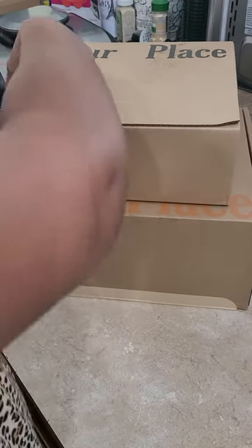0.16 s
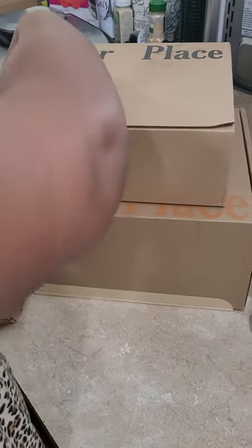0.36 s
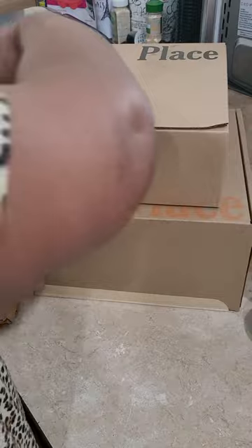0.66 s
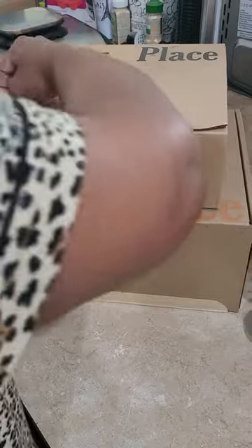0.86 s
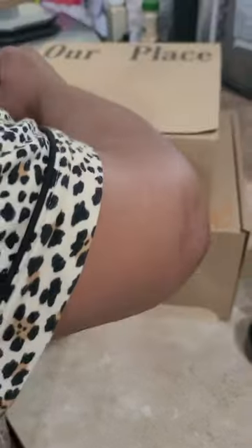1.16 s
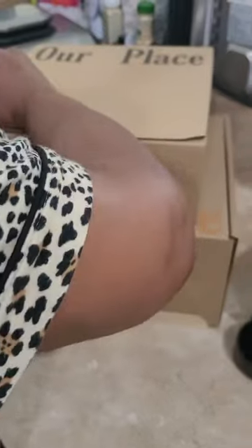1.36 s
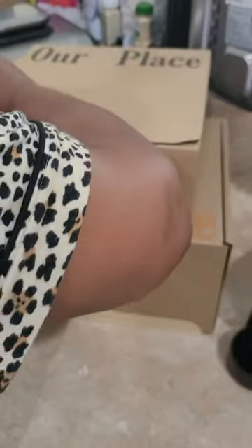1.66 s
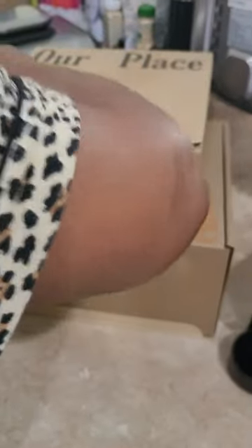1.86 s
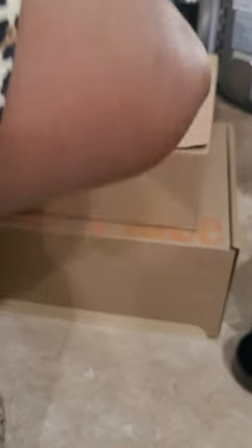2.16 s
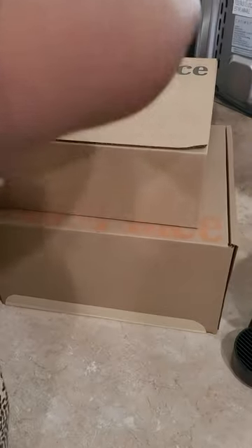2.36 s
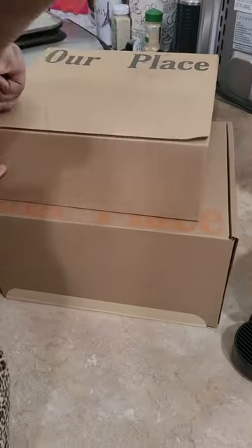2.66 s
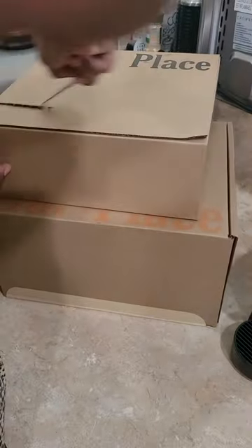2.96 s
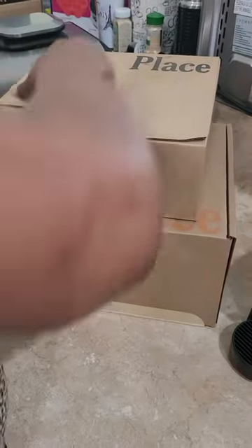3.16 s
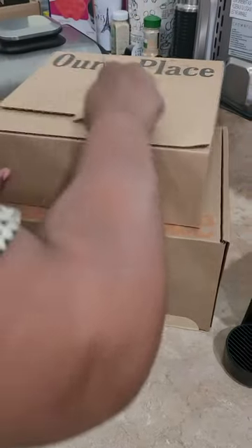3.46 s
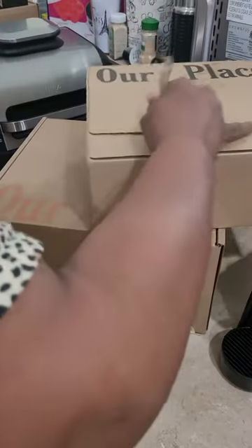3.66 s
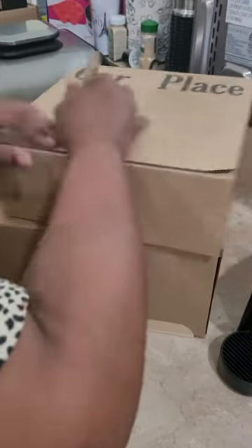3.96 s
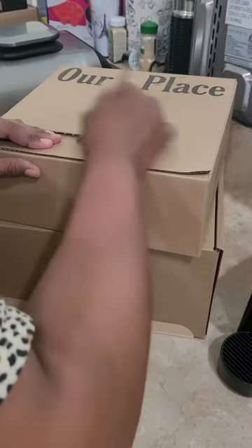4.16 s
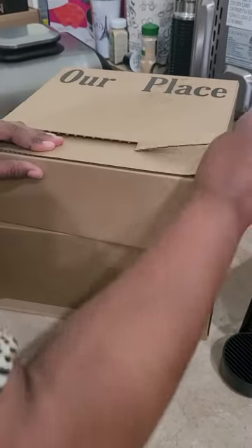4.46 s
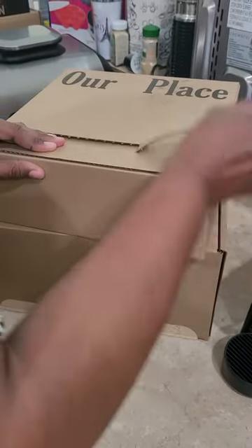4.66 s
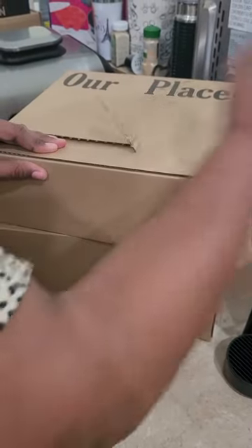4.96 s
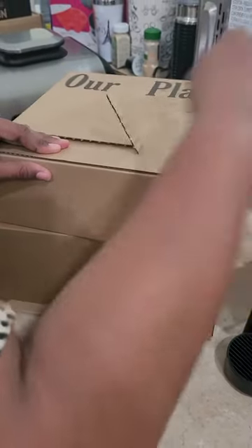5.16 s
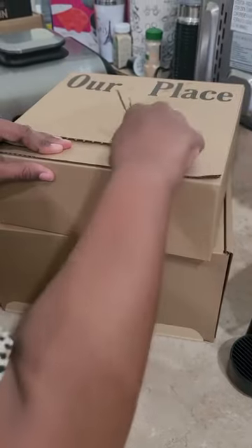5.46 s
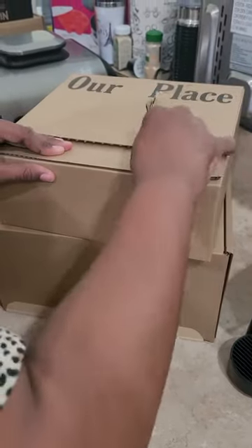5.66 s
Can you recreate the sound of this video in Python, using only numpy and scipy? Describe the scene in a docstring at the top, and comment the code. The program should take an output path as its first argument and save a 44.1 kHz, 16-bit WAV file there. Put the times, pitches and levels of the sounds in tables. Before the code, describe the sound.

In a small kitchen with low steady appliance hum, fingers faintly tap and brush a cardboard box. A nail picks at its tab, then the perforated strip rips in uneven bursts of snaps, papery rasp and hollow lid thumps, with shorter pulls and rubs afterwards. Close stereo microphones hear the box somewhat to the left, with a short room echo.

```python
"""Opening a cardboard box

Fingers tap, brush and pick at a box in a kitchen, then rip its perforated strip in several pulls.
Each paper bridge snaps with a noise crack and ringing panels; noise made of tiny breaks rasps in between.
The lid and flap boom as low resonances. Two spaced microphone ports hear the box from the left,
in a small room of fading noise echoes, over a low appliance hum of shaped noise."""
import sys
import numpy as np
from scipy import signal
from scipy.fft import rfft, irfft, next_fast_len
from scipy.io import wavfile
from scipy.ndimage import map_coordinates

SR = 44100
rng = np.random.default_rng(int(sys.argv[2]) if len(sys.argv) > 2 else 0)


def transcribe(u):
    """Save the signal u as a 16-bit wav file named by the first command-line argument.

    u: samples, shape (n,) or (channels, n), limited to [-1, 1]; the rate is SR.
    q: integer samples, one column per channel.
    """
    v = np.clip(np.atleast_2d(u).T, -1, 1)
    q = np.round(v * 32767).astype(np.int16)
    wavfile.write(sys.argv[1], SR, q)


N = 256662  # length in samples

# Paper bridges snapping: start_s, crack_db, panel_knock_db, edge_tick_db
BRIDGE_SNAPS = [(2.706, -23.5, -29.5, -18), (2.748, -20, -35, -27.5), (2.758, -16, -24.5, -14.5),
                (2.813, -22, -15.5, -22.5), (2.830, -22.5, -18, -19.5), (2.846, -20, -20, -15.5),
                (2.877, -20, -18, -23), (2.889, -20, -28, -21.5), (2.903, -26, -29, -20),
                (2.919, -18, -22.5, -23), (3.267, -27, -32.5, -26.5), (3.316, -31, -23, -31),
                (3.364, -19, -23, -29), (3.387, -21, -30, -34), (3.446, -40.5, -22.5, -22.5),
                (3.467, -28, -24, -31), (3.487, -54, -12, -9), (3.496, -46, -14, -25),
                (3.588, -57, -19.5, -19.5), (3.730, -36.5, -43, -34), (3.839, -25, -38.5, -24),
                (4.058, -17.5, -39, -26.5), (4.088, -23, -28.5, -36), (4.124, -10.5, -20.5, -15),
                (4.149, -19, -24.5, -29.5), (4.169, -20, -21, -40), (4.193, -15, -24, -31),
                (4.211, -12.5, -16.5, -26), (4.237, -17.5, -16.5, -14.5), (4.772, -47, -38, -48.5),
                (4.811, -19.5, -25, -29.5), (4.84, -34, -27.5, -37), (4.855, -21, -16.5, -20.5),
                (5.724, -38.5, -61, -64.5), (5.74, -29.5, -30, -23), (5.751, -14.5, -16, -12),
                (5.8, -25.5, -31, -20)]
# Resonances of the corrugated panels: pitch_hz, width_hz, level_db
PANEL_MODES = [(660, 133, 3.5), (805, 72, 6), (1084, 272, 0.5)]
# Resonances of the stiff cut edge: pitch_hz, width_hz, level_db
EDGE_MODES = [(1277, 242, 8), (1753, 82, 4.5), (1950, 540, -1.5)]


def snaps():
    """Each breaking bridge is a crack of paper, a tick in the edge and a knock in the panels."""
    start_s, crack_db, knock_db, tick_db = np.transpose(BRIDGE_SNAPS)
    bands_hz = crack_band(crack_db, tick_db)
    crack = fibre(cracks(start_s, crack_db, bands_hz, t60=0.012, fray=0.18, focus_db=5.5))
    knock = struck(start_s, knock_db, PANEL_MODES, contact=0.00084, spread=0.0044)
    tick = struck(start_s, tick_db, EDGE_MODES, contact=0.0002, spread=0.0064)
    return crack + knock + tick


def crack_band(crack_db, ring_db):
    """The more a break cracks over its ring or tick, the lower its favoured band, in Hz."""
    octave_per_db = -0.06
    return 5570 * 2 ** (octave_per_db * (crack_db - ring_db))


# Bright colour of breaking paper: pitch_hz, level_db (per Hz)
FIBRE_COLOUR = [(1700, -37), (2260, 3.5), (2830, 1), (7200, -1), (8250, 2.5), (9600, -3), (14300, -3),
                (16000, -9.5)]


def fibre(x):
    """The bright colour of breaking paper."""
    return coloured(x, FIBRE_COLOUR)


# Soft rubbing, thinner than tearing: pitch_hz, level_db (per Hz)
RUB_COLOUR = [(1500, -32.5), (3000, 4.5), (5500, 5), (9000, 6.5), (16000, -5)]
# The lid shaking while it is handled: time_s, rumble_db
LID_SHAKE = [(2.6, -86), (2.74, -42), (2.95, -40), (3.05, -70), (3.27, -52), (3.35, -27.5), (3.52, -57),
             (3.7, -50.5), (3.92, -43.5), (4.04, -53), (4.2, -28), (4.45, -85), (4.84, -39.5), (5.0, -74),
             (5.4, -52.5), (5.62, -78)]


def pull():
    """Gentle effort only rubs; strong effort parts fibres in grit. Board rattles and lid rumbles too."""
    rasp_db, rattle_db = efforts()
    tearing = np.clip((rasp_db + 53) / 16, 0, 1)  # 0 only rubs, 1 only tears
    rub_grit = grit(per_s=900, scatter_db=1.5, smooth=2.5, t60=0.01, count=2)
    rub = unit(coloured(rub_grit, RUB_COLOUR))
    tear = unit(fibre(grit(per_s=330, scatter_db=4, smooth=0.65, t60=0.006, count=2)))
    common, own = amp(rasp_db) * (np.sqrt(1 - tearing) * rub + np.sqrt(tearing) * tear)

    # A rasp comes from a long line of paper, so the ports hear partly unlike noise
    wide = 0.6  # radians
    rasp = np.cos(wide) * common + np.sin(wide) * np.array([own, -own])

    rattling = grit(per_s=80, scatter_db=-3.5, smooth=0.24, t60=0.063)
    rattle = amp(rattle_db) * unit(ringing(rattling, PANEL_MODES + EDGE_MODES, spread=0))

    shaking = grit(per_s=100, scatter_db=-3, smooth=0.95, t60=0.079)
    upper_lid = ringing(shaking, LID_MODES[:1], spread=0)
    deep_lid = amp(5.5) * ringing(shaking, LID_MODES[1:], spread=0)
    flap = amp(-4) * ringing(shaking, FLAP_MODES, spread=0)
    rumble = amp(curve(LID_SHAKE)) * unit(upper_lid + deep_lid + flap)
    return rasp + rattle + rumble


# Pulls on the strip or lid, one list for each pull: time_s, fibre_rasp_db, panel_rattle_db
STRIP_PULLS = [
    [(2.705, -42, -32.5), (2.745, -34.5, -41), (2.868, -31, -36), (2.91, -31.5, -28), (2.96, -41.5, -52)],
    [(3.27, -42, -39), (3.372, -33.5, -32), (3.422, -43.5, -46), (3.485, -39, -30.5), (3.515, -47, -36.5),
     (3.587, -44.5, -41.5), (3.751, -49, -54.5), (3.851, -42, -49.5), (3.991, -49.5, -44.5),
     (4.03, -55, -66)],
    [(4.088, -30.5, -45.5), (4.1, -29.5, -35.5), (4.118, -58, -52), (4.145, -31, -27),
     (4.185, -25.5, -32.5), (4.235, -32, -34), (4.28, -45, -53), (4.33, -55.5, -55.5)],
    [(4.735, -58, -65), (4.813, -43.5, -43), (4.845, -39, -37), (4.869, -47, -38.5), (4.93, -57.5, -76)],
    [(5.45, -51, -60), (5.475, -50.5, -47), (5.51, -48, -60), (5.565, -50, -57)],
    [(5.728, -53.5, -69.5), (5.74, -61, -48), (5.757, -48, -51), (5.78, -40.5, -55), (5.82, -37.5, -46)],
]
# Hands and sleeves brushing the board: full_contact_s, swell_s, hold_s, rasp_db
HAND_RUBS = [(0.0, .01, 0.042, -50.5), (0.563, 0.071, 0.051, -61), (0.854, 0.031, 0.0071, -64),
             (1.088, 0.012, 0.0064, -64), (1.464, 0.017, 0.012, -59), (1.592, 0.047, 0.038, -59),
             (1.735, 0.03, 0.011, -47.5), (1.787, 0.028, 0.15, -62), (2.572, 0.089, 0.0049, -43.5),
             (2.672, 0.058, 0.012, -53), (3.034, 0.12, 0.092, -59), (4.383, 0.046, 0.073, -61),
             (4.638, 0.12, 0.052, -64), (5.038, .015, 0.084, -58), (5.293, 0.0093, 0.004, -55),
             (5.194, 0.038, 0.013, -58.5), (5.352, 0.029, 0.031, -51)]


def efforts():
    """Levels of rasp and rattle in dB: the strongest gesture at each moment."""
    pull_swell_s = 0.014  # a pull starts sharply
    rasps, rattles = [], []
    for rows in STRIP_PULLS:
        time_s, rasp_db, rattle_db = np.transpose(rows)
        rasps.append(gesture(time_s, rasp_db, pull_swell_s))
        rattles.append(gesture(time_s, rattle_db, pull_swell_s))
    for contact_s, swell_s, hold_s, rasp_db in HAND_RUBS:
        rasps.append(gesture([contact_s, contact_s + hold_s], [rasp_db, rasp_db], swell_s))
    return np.max(rasps, axis=0), np.max(rattles, axis=0)


def gesture(time_s, level_db, swell_s):
    """A level curve in dB that swells into its first point and fades after its last."""
    swell_db, fade_db_per_s = 21.5, 489
    t = np.arange(N) / SR
    before = np.maximum(time_s[0] - t, 0)
    after = np.maximum(t - time_s[-1], 0)
    return np.interp(t, time_s, level_db) - swell_db * before / swell_s - fade_db_per_s * after


# The lid jumping back: start_s, boom_db, flap_db
LID_THUMPS = [(0.663, -54, -37), (1.836, -41.5, -65), (2.563, -66, -31.5), (2.705, -21, -18.5),
              (2.769, -16, -20.5), (2.782, -20, -19.5), (2.811, -16, -14), (2.842, -14.5, -14.5),
              (2.878, -14.5, -15), (3.03, -40.5, -42), (3.155, -40, -43), (3.303, -33, -29),
              (3.322, -24, -23.5), (3.358, -17, -17.5), (3.439, -29, -13), (3.469, -16.5, -12.5),
              (3.491, -13, -15), (3.502, -44, -7), (3.552, -26.5, -18), (3.582, -14.5, -15.5),
              (4.092, -17.5, -34.5), (4.127, -27.5, -17.5), (4.151, -17, -20), (4.167, -16, -18.5),
              (4.176, -14, -20), (4.21, -8, -16), (4.24, -20.5, -17.5), (4.81, -35.5, -25.5),
              (4.851, -15, -12), (5.242, -37, -33.5), (5.291, -20, -29.5), (5.743, -51, -14),
              (5.797, -30, -29)]
# Resonances of air and lid together: pitch_hz, width_hz, level_db
LID_MODES = [(158.7, 33, 4), (60.6, 54, -3)]
# Resonances of the loose flap: pitch_hz, width_hz, level_db
FLAP_MODES = [(251, 210, -2), (316.5, 56, 5), (446.5, 37, -1)]


def thumps():
    """The released lid and flap swing a few cycles."""
    start_s, boom_db, flap_db = np.transpose(LID_THUMPS)
    boom = struck(start_s, boom_db, LID_MODES, contact=0.0028, spread=0.082)
    flap = struck(start_s, flap_db, FLAP_MODES, contact=0.0019, spread=0.0895)
    return boom + flap


# A fingernail picking at the tab of the strip: start_s, crack_db, tab_ring_db
NAIL_PICKS = [(1.7335, -36, -18), (2.435, -27.5, -56), (2.561, -32, -27.5), (2.571, -24, -14.5)]
# Resonances of the small stiff tab: pitch_hz, width_hz, level_db
TAB_MODES = [(1036, 340, -6.5), (1760, 125, 1.5), (3720, 1300, -6.5)]


def picks():
    """The nail slips off the tab with a thin short crack and leaves it ringing."""
    start_s, crack_db, ring_db = np.transpose(NAIL_PICKS)
    bands_hz = crack_band(crack_db, ring_db)
    crack = cracks(start_s, crack_db, bands_hz, t60=0.0092, fray=0.068, focus_db=5)
    ring = struck(start_s, ring_db, TAB_MODES, contact=0.000076, spread=0.0054)
    return coloured(crack, RUB_COLOUR) + ring


# Fingertips tapping the lid: start_s, panel_knock_db, edge_tick_db
FINGER_TAPS = [(0.1335, -39, -47), (0.3985, -38, -46), (0.667, -42.5, -36), (0.786, -44, -65),
               (0.892, -39, -44), (0.983, -43, -48), (1.182, -38, -37), (3.98, -25.5, -31),
               (3.996, -25, -28.5), (5.242, -31.5, -41)]


def taps():
    """A fingertip only knocks the panels and ticks the edge, all pitches at once."""
    start_s, knock_db, tick_db = np.transpose(FINGER_TAPS)
    knock = struck(start_s, knock_db, PANEL_MODES, contact=0.00063, spread=0)
    tick = struck(start_s, tick_db, EDGE_MODES, contact=0.00029, spread=0)
    return knock + tick


def cracks(times, levels_db, bands_hz, t60, fray, focus_db):
    """A puff of noise at each time: lead-in, fast break, frayed end and its own favoured band."""
    # Fibres give way a moment before the break, rising to lead_db under it
    lead_s, lead_db = 0.008, -17
    hold_s = 0.0014  # the break builds and holds this long before it dies
    out, t = np.zeros(N + SR), np.arange(SR // 10) / SR - lead_s
    lead = amp(lead_db + 20 * t / lead_s)
    fade = amp(-60 * np.maximum(t - hold_s, 0) / t60)
    build = np.minimum(0.24 + t / hold_s, 1)
    frayed_end = fray * amp(-60 * t / 0.082)
    puffs = rng.standard_normal((len(times), len(t))) * np.where(t < 0, lead, fade * build + frayed_end)

    octaves = np.log2((np.fft.rfftfreq(len(t), 1 / SR) + 1) / bands_hz[:, None])
    puffs = irfft(rfft(puffs) * amp(-focus_db * np.minimum(octaves ** 2, 3)), len(t))
    size = np.sqrt(t60 * SR / (2 * np.log(1000)))  # that of a plain fade from level 1
    for s, db, puff in zip(times, levels_db, puffs):
        out[round((s - lead_s) * SR):][:len(t)] += amp(db) * puff * size / np.linalg.norm(puff)
    return out[:N]


def struck(times, peaks_db, modes, contact, spread):
    """A push lasting contact seconds rings the modes to each peak; the grip retunes them each time."""
    retune = 0.05  # typical share by which a pitch strays from blow to blow
    out, push = np.zeros(N + SR), np.pad(np.hanning(round(contact * SR)), (0, SR // 5))
    shifts = rng.standard_normal((len(times), len(modes)))
    for s, db, shift in zip(times, peaks_db, shifts):
        retuned = [(hz * (1 + retune * u), width, g) for (hz, width, g), u in zip(modes, shift)]
        ring = ringing(push, retuned, spread)
        out[round(s * SR):][:len(ring)] += amp(db) * ring / np.abs(ring).max()
    return out[:N]


def ringing(x, modes, spread):
    """Resonances; bending waves in board bring the lows later, by spread / sqrt(Hz) seconds."""
    top_hz = 2.5 * max(hz for hz, width, db in modes)  # soft board passes little above its modes

    def response(f):
        rings = 0
        for k, (hz, width, db) in enumerate(modes):
            mode = 1j * f * width / (hz * hz - f * f + 1j * f * width)
            rings = rings + (-1) ** k * amp(db) * mode  # neighbours push opposite ways
        return rings * np.exp(-4j * np.pi * spread * np.sqrt(f)) / (1 + 1j * f / top_hz)
    return filtered(x, response)


def grit(per_s, scatter_db, smooth, t60, count=1):
    """Noise that flares at tiny breaks of unequal size and dies in t60 seconds after each."""
    sizes = amp(scatter_db * np.minimum(rng.exponential(size=N), 3))
    breaks = (rng.random(N) < per_s / SR) * sizes
    flares = signal.fftconvolve(breaks, amp(-60 * np.arange(SR // 20) / SR / t60))[:N]
    return (unit(flares) + smooth) * rng.standard_normal((count, N))


# The box is nearer the left port, left over right: pitch_hz, level_db
LEFT_OVER_RIGHT = [(250, -1), (550, 8.5), (2000, 1.5), (8000, 1.5), (14000, 8.5)]


def direct(x, lag=0.0003555, wander=0.00008, rate=12):
    """Left hears the box first and mostly louder; the sounding spot wanders (lags in s, rate in Hz)."""
    side, n = np.array([[0.5], [-0.5]]), np.arange(N)
    spots = rng.standard_normal(int(N * rate / SR) + 4)
    shift = SR * (lag + wander * map_coordinates(spots, [n * rate / SR]))
    pair = np.array([map_coordinates(port, [n + half * shift]) for port, half in zip(x, side)])
    return filtered(pair, lambda hz: amp(side * along(LEFT_OVER_RIGHT, hz)))


# How long the room rings: pitch_hz, t60_s (time to fade by 60 dB)
ROOM_FADE = [(150, 0.2), (700, 0.21), (4000, 0.16), (13000, 0.11)]


def room(x, step=SR // 10):
    """The room's fading noise echo, a little different each moment as the body moves."""
    out = np.zeros((2, N + SR))
    for k in range(0, N, step):
        hz, t, z = signal.stft(rng.standard_normal((2, SR // 4)), SR, nperseg=256)
        fading = z * amp(-60 * t / along(ROOM_FADE, hz)[:, None])
        tail = signal.istft(fading, SR, nperseg=256)[1]
        wet = signal.fftconvolve(x[None, k:k + step], tail / np.linalg.norm(tail[0]), axes=1)
        out[:, k + 150:][:, :wet.shape[1]] += wet  # echoes start 150 samples late
    return around(out[:, :N])


# Sound from all around: pitch_hz, left_right_likeness (1 same, 0 unrelated, -1 opposite)
LIKENESS = [(60, 0.88), (180, 0.96), (550, -0.28), (1650, -0.34), (4970, -0.03), (15000, -0.19)]


def around(pair):
    """Two unrelated signals mixed as the ports hear sound from all sides."""
    def turned(hz):
        turn = np.arccos(np.clip(along(LIKENESS, hz), -1, 1)) / 2
        return np.array([np.cos(turn), np.sin(turn)])
    mid, side = filtered(pair, turned)
    return np.array([mid + side, mid - side])


# Colour of the appliance hum: pitch_hz, level_db (per Hz)
HUM_COLOUR = [(25, -2), (80, -6), (200, -7.5), (340, -1.5), (430, -7), (750, -9.5), (1200, -17),
              (2800, -21.5), (5000, -30.5), (10000, -39.5), (16000, -51)]


def hum():
    """Fans and appliances fill the room evenly: steady noise, strongest in the lows."""
    noise = coloured(rng.standard_normal((2, N)), HUM_COLOUR)
    return amp(-54.5) * unit(around(noise))


def amp(db):
    """dB to gain."""
    return 10 ** (np.asarray(db) / 20)


def unit(x):
    """Scaled to an rms level of 1."""
    return x / np.sqrt(np.mean(x ** 2) + 1e-20)


def along(points, hz):
    """Values read between (Hz, value) points on a log pitch axis."""
    f, v = np.transpose(points)
    return np.interp(np.log(hz + 1), np.log(f + 1), v)


def curve(rows):
    """One value per sample from (seconds, value) rows."""
    return np.interp(np.arange(N) / SR, *np.transpose(rows))


def filtered(x, response):
    """x shaped by a complex response of frequency."""
    n = x.shape[-1]
    m = next_fast_len(n + SR // 4)
    return irfft(rfft(x, m) * response(np.fft.rfftfreq(m, 1 / SR)), m)[..., :n]


def coloured(x, points):
    """x shaped by (Hz, dB) points."""
    return filtered(x, lambda hz: amp(along(points, hz)))


def scene():
    """The box, heard straight and through the room, over the hum."""
    box = pull() + picks() + snaps() + taps() + thumps()
    # The walls return less of the lid's bass
    bass_hz, bass_share = 353, 0.73
    thin = filtered(box[0], lambda hz: (bass_share * bass_hz + 1j * hz) / (bass_hz + 1j * hz))
    return amp(-0.5) * direct(box) + amp(-3.5) * room(thin) + hum()


def record(dry):
    """The microphone loses the deepest bass, and nothing at or above 16000 Hz is kept."""
    return filtered(dry, lambda hz: (1j * hz / (40 + 1j * hz)) ** 2 * (hz < 16000))


dry = scene()
out = record(dry)
transcribe(out)
```